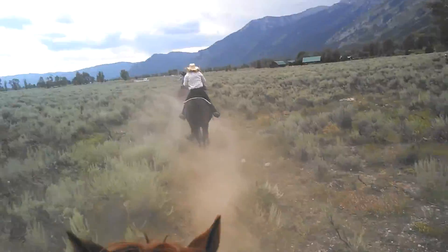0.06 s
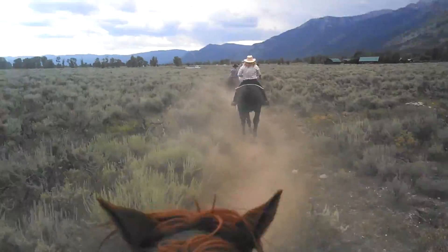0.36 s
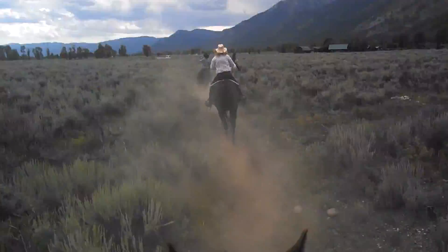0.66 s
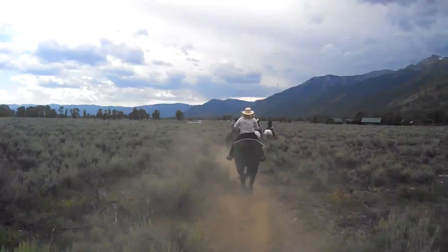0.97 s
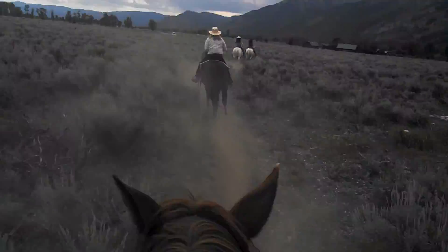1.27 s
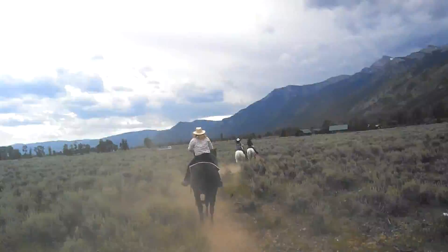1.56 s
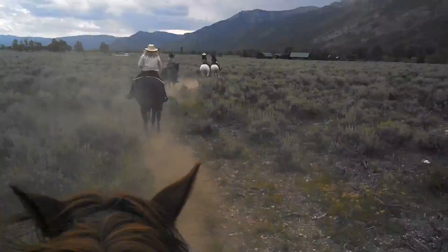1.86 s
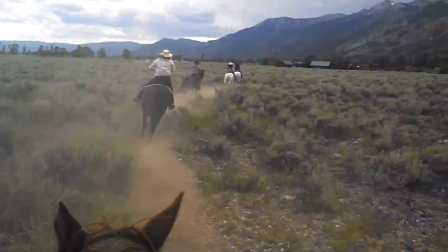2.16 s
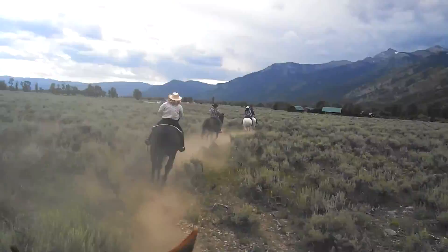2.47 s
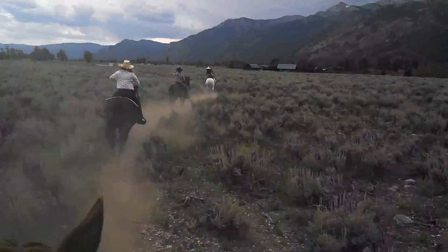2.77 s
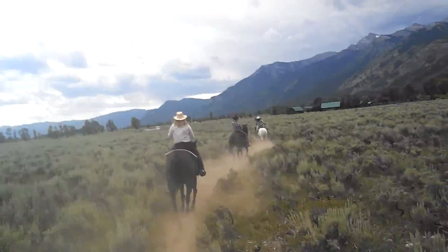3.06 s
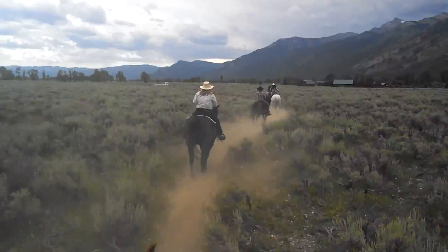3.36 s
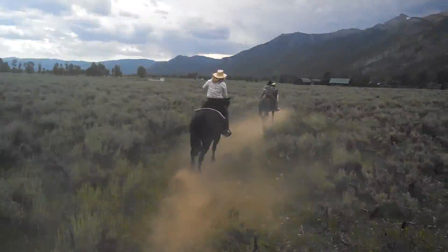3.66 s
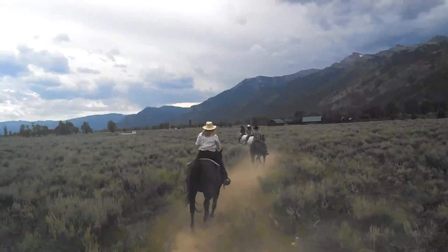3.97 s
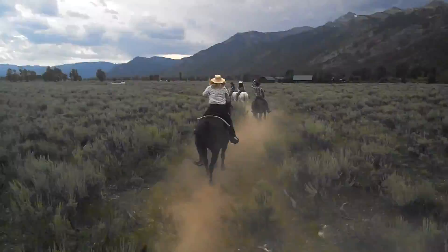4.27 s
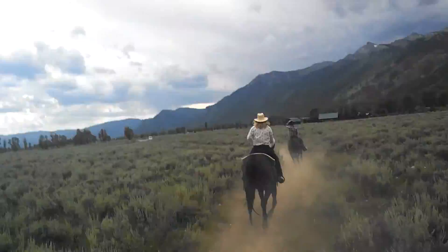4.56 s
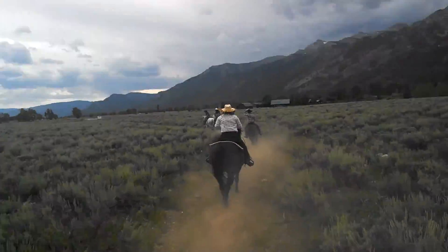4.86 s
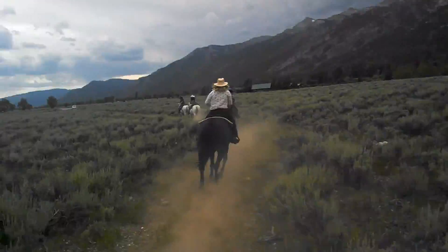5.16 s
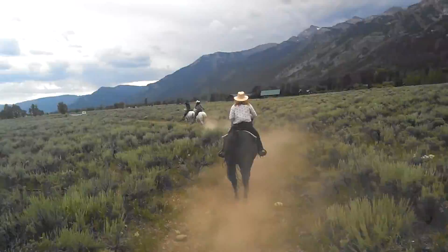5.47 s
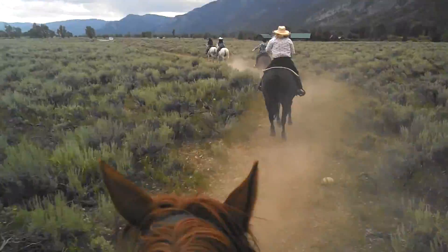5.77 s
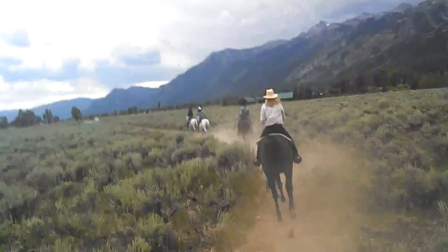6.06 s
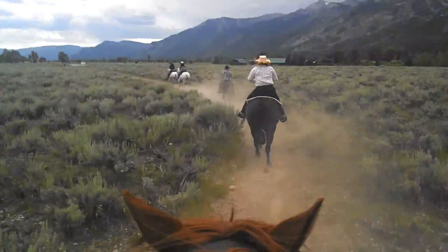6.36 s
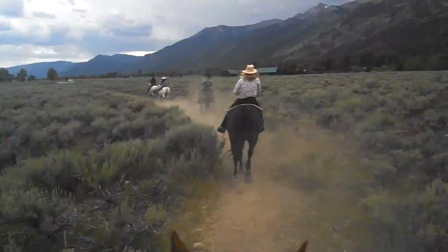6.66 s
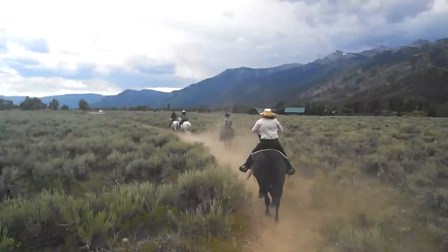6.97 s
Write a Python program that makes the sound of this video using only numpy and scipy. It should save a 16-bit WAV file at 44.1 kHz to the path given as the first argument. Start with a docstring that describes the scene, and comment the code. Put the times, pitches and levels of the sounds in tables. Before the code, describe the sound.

Gusty wind rumbles and thumps on the microphone with each jolt of a trotting horse, over dull hoofbeats and rustling tack.

```python
"""Trotting on a dry dirt trail

Heard from a small camera worn by the rider. Hooves thud and throw grit, clothes and tack rustle,
a buckle rings faintly, the saddle squeaks once. Every jolt drives air over the two microphone ports:
both flutter, the right one also rumbles and pops. The camera widens the pair into stereo."""
import sys
import numpy as np
from scipy import signal
from scipy.fft import rfft, irfft, next_fast_len
from scipy.io import wavfile

SR = 44100
rng = np.random.default_rng(int(sys.argv[2]) if len(sys.argv) > 2 else 0)


def put_to_file(sound):
    """Save the sound as 16-bit audio at rate SR, in the file named by the first command-line argument."""
    columns = np.atleast_2d(sound).T  # one column per channel
    safe = np.clip(columns, -1, 1)
    whole_steps = np.round(safe * 32767)
    wavfile.write(sys.argv[1], SR, whole_steps.astype(np.int16))


N = 317608
TIME = np.arange(N) / SR

# Cue levels are relative, ahead of the mix gains.
# the trot, a jolt and a lull per step: t/s, lull depth/dB, time to its bottom/s, rumble/dB, flutter/dB,
# rustle/dB
TROT_STEPS = [(0.208, 5.5, 0.14, -20.5, -30, -50), (0.707, 6, 0.19, -24.5, -36.5, -54.5),
              (1.178, 13, 0.19, -21.5, -26.0, -40.5), (1.712, 12.0, 0.1, -22.5, -29, -46.5),
              (2.236, 4, 0.15, -28.5, -37.5, -52.5), (2.681, 7.5, 0.18, -27, -35, -53.5),
              (3.243, 5.5, 0.12, -31, -36.5, -53), (3.755, 9, 0.11, -19, -29, -49),
              (4.17, 9, 0.1, -25, -34.5, -48.5), (4.68, 3.5, 0.049, -32.5, -38.5, -56),
              (5.224, 1, 0.037, -37.5, -35.5, -58.5), (5.692, 7, 0.075, -32, -31, -52),
              (6.207, 13, 0.2, -27, -32, -48.5), (6.686, 14.5, 0.083, -20, -32, -43.5),
              (7.171, 7, 0.24, -25, -32, -51.5)]
# wind gusts: t/s, rumble lift/dB, flutter lift/dB, half length/s
WIND_GUSTS = [(0.425, 8.5, 1, 0.049), (0.602, 16, 14.5, 0.028), (1.113, 5.5, -5.5, 0.024),
              (1.48, 5.5, 7, 0.084), (2.01, 3, -2, 0.04), (3.305, 6.5, 3.5, 0.079), (3.587, 6.5, 5, 0.14),
              (4.012, 8, 9.5, 0.017), (4.489, 10.5, 11, 0.029), (4.646, 6, 13, 0.038),
              (5.574, 9.5, 2.5, 0.039), (5.677, 19, -0.5, 0.04), (6.524, 9.5, 12, 0.16)]
# the loudest scuffs of grit and cloth: t/s, level/dB, decay/s, brightness (crunch turned down)/dB
LOUD_SCUFFS = [(0.047, -36, 0.0087, -4.5), (0.118, -37.5, 0.017, 5), (0.183, -23.5, 0.0015, -5),
               (0.247, -23, 0.00061, 25), (0.592, -45.5, 0.015, 11), (0.681, -40, 0.01, -2),
               (0.797, -36.5, 0.0037, 5), (0.961, -34.5, 0.004, 0), (1.01, -39, 0.015, -7.5),
               (1.063, -42.5, 0.018, 10), (1.126, -37, 0.0066, 2), (1.147, -30, 0.0087, -2),
               (1.183, -25, 0.00092, -13.5), (1.323, -34, 0.0015, 7), (1.494, -32, 0.00098, -4),
               (1.63, -35, 0.0073, -1.5), (1.651, -35, 0.0049, 1), (1.71, -28, 0.0025, 11),
               (1.749, -30.5, 0.0012, 9), (2.139, -34, 0.009, -1), (2.227, -38, 0.0078, 0),
               (2.273, -38, 0.0042, 0), (2.318, -40, 0.0042, 6), (2.678, -27.5, 0.0015, -3.5),
               (3.141, -33.5, 0.0026, 0), (3.318, -37.5, 0.0037, -1.5), (3.51, -44, 0.0088, -6),
               (3.57, -33.5, 0.0014, 2), (3.598, -33, 0.0053, 0.5), (3.678, -30, 0.0013, 21),
               (3.708, -21, 0.0016, 41), (4.11, -24, 0.0023, 0.5), (4.252, -41.5, 0.0051, -6.5),
               (4.486, -44, 0.0061, -6), (4.775, -34.5, 0.0078, 9), (4.845, -41.5, 0.0022, 3),
               (4.894, -37.5, 0.0035, 4), (5.112, -33.5, 0.0054, 4), (5.171, -39, 0.0015, 8),
               (5.482, -37.5, 0.0031, -11), (5.915, -28.5, 0.0016, 13), (5.95, -35, 0.0065, 2),
               (6.114, -34.5, 0.0088, 1), (6.388, -36, 0.011, 1), (6.493, -32, 0.0075, -4.5),
               (6.559, -39.5, 0.0039, -7.5), (6.601, -48, 0.036, -2), (6.63, -31, 0.0041, -7),
               (7.183, -29.5, 0.0024, -6)]
# hoof falls: t/s, level/dB, puff decay/s
HOOF_FALLS = [(0.065, -26.5, 0.0047), (0.178, -31, 0.0037), (0.816, -44, 0.005), (0.952, -22, 0.0086),
              (1.025, -17.5, 0.005), (1.146, -20, 0.012), (1.316, -35.5, 0.0072), (1.464, -23.5, 0.0085),
              (1.632, -20.5, 0.043), (1.914, -23, 0.0089), (2.009, -24, 0.027), (2.449, -32, 0.0076),
              (2.559, -28, 0.013), (2.719, -35, .003), (3.051, -30, 0.0098), (3.141, -32, 0.021),
              (4.144, -24.5, 0.012), (4.439, -20, 0.0031), (5.54, -34, 0.012), (5.777, -30, 0.0029),
              (6.045, -25, 0.0072), (6.127, -26, 0.038), (6.496, -27, 0.028), (6.627, -26, 0.022)]
# modes of a hoof's hollow knock: f/Hz, level/dB, t60/s
KNOCK_MODES = [(375, -10.5, 0.033), (520, -8, 0.041), (810, -9.5, 0.038), (1045, -12, 0.02)]
# air pops on the right port, the strong ones in step with the trot: t/s, level/dB, spike width/s
AIR_POPS = [(0.1725, -16.5, 0.000077), (0.2079, 3, 0.000079), (0.2656, 0.0, 0.000095),
            (0.581, -12, 0.00011), (0.7073, -8.5, 0.000052), (1.1785, 0.5, 0.000071), (1.2, -7, 0.00037),
            (1.2198, -5.5, 0.000087), (1.2805, -15, 0.00014), (1.7134, 4.5, 0.000094),
            (1.9173, -18.5, 0.0001), (1.9946, -9.5, 0.00037), (2.124, -14, 0.00016), (2.2361, 2.5, 0.00012),
            (2.6804, 3, 0.00039), (3.2426, -1, 0.00013), (3.4295, -7.5, 0.00032), (3.7565, 4.5, 0.00012),
            (4.1115, -7.5, 0.000052), (4.1703, 4.5, 0.00045), (4.6803, 0.0, 0.000069), (5.0022, 4, 0.00032),
            (5.224, -2.5, 0.000094), (5.6919, -0.5, 0.000086), (6.2067, -5, 0.00015),
            (6.2468, -19.5, 0.00011), (6.545, -8.5, 0.00099), (6.5795, -3.5, 0.00048),
            (6.6153, -12.5, 0.00021), (6.6673, -7.5, 0.001), (6.688, 5.5, 0.00087),
            (6.8551, -14.5, 0.00028), (7.1182, -6.5, 0.000087), (7.1712, -5.5, 0.00011)]
# single eddies shaking the right port: t/s, level/dB, f/Hz, length/s
PORT_EDDIES = [(0.611, 0, 189, 0.0044), (1.029, -15, 520, 0.0021), (1.468, -13, 480, 0.0018),
               (2.185, -11, 261, 0.0019), (2.686, -5.5, 160, 0.002), (3.562, -4.5, 115, 0.0037),
               (4.176, -5.5, 168.5, 0.0033), (5.567, -22.5, 255, 0.011), (6.429, -13.5, 109, 0.0088),
               (6.525, -9.5, 165, 0.004)]
# touches on the buckle: t/s, level/dB
BUCKLE_TOUCHES = [(1.305, -54), (2.942, -46), (3.35, -54), (4.78, -55), (4.913, -40.5), (5.94, -53),
                  (6.8, -51)]
# contour of the leather squeak: t/s, f/Hz, level/dB
SQUEAK_CURVE = [(4.5, 1343, -65), (4.525, 1400, -47), (4.547, 1568, -55), (4.565, 1465, -49),
                (4.585, 1360, -47), (4.605, 1360, -49), (4.64, 1290, -76)]
# EQ curves of the noise layers: f/Hz, level/dB
FLUTTER_EQ = [(90, -22), (160, 2.5), (230, 1.5), (350, -2.5), (500, -10), (750, -18), (1100, -32),
              (2000, -39), (4000, -86)]  # low-mid buffeting of air
RUMBLE_EQ = [(25, 5), (40, -5), (58, 1), (85, -2.5), (130, -8.5), (200, -17.5), (300, -52), (600, -95)]  # bass of the wind
RUSTLE_EQ = [(400, 9), (1000, 11), (1800, 7), (3000, 5), (4300, 2.5), (6000, -3.5), (8500, 1.5),
             (11500, -8.5), (14800, -2.5), (17000, -15)]  # hiss of dust and cloth
GRIT_EQ = [(2500, -32), (4500, 6), (6000, 1.5), (8500, 6), (12000, -3.5), (14800, 1), (17000, -11)]  # bright sand clicks
CRUNCH_EQ = [(400, 4), (1000, 3.5), (1900, -0.5), (3000, 0), (4200, -1.5), (6000, -15)]  # midrange body of a scuff
THUD_EQ = [(100, 11.5), (250, 13.5), (500, 3), (1000, -7), (1500, -5), (3000, -24), (8000, -43)]  # dull puff of dirt

RUMBLE_LULL_SHARE, RUSTLE_GUST_SHARE = 0.66, 0.64  # how far rumble follows a lull, and rustle a gust
LIGHT_SCUFF_COUNT, LIGHT_SCUFF_DB, LIGHT_SCUFF_S = 32, 9.5, 0.0017  # dB over the rustle; typical decay
REBOUND_HZ, SLOW_POP_S = 123, .00019  # a pop's bass cut rises in proportion for spikes wider than this
BUCKLE_HZ, BUCKLE_T60_S = 12575, 0.16
PORT_LAG_S, CUTOFF_HZ = .000357, 15900


def from_db(db):
    return 10 ** (np.asarray(db) / 20)


def rms_one(x):
    return x / np.sqrt(np.mean(x ** 2) + 1e-20)


def cut(x, hz, kind, order=2):
    """Butterworth low-pass or high-pass."""
    return signal.sosfilt(signal.butter(order, np.clip(hz, 10, .45 * SR), kind, fs=SR, output="sos"), x)


def add(track, s, piece):
    """Mixes a piece in from time s on."""
    i = int(np.clip(round(s * SR), 0, N - 1))
    track[i:i + len(piece)] += piece[:N - i]


def drift(rate):
    """Smooth random modulator, rms 1, rolling off above rate in Hz."""
    pole = np.exp(-20 * np.pi * rate / SR)
    slow = signal.lfilter([1], [1, -2 * pole, pole * pole], rng.standard_normal(N // 10 + 2002))[2000:]
    return np.interp(np.arange(N) / 10, np.arange(len(slow)), rms_one(slow))


def coloured(source, eq):
    """A source through an EQ curve, rms 1."""
    size = next_fast_len(N)
    hz, level_db = np.transpose(eq)
    bins = np.fft.rfftfreq(size, 1 / SR) + 1e-3
    gain = from_db(np.interp(np.log(bins), np.log(hz), level_db)) * np.minimum(bins / hz[0], 1) ** 2
    return rms_one(irfft(rfft(source, size) * gain, size)[:N])


def noise(eq):
    return coloured(rng.standard_normal(N), eq)


def lumpy(x, depth_db, rate):
    """Turbulence or grain: the level jumps about, its mean power stays."""
    return x * rms_one(from_db(depth_db * np.clip(drift(rate), -2, 2)))


def patchy(x, depth_db, rate):
    """Rubbing keeps changing colour: overlapping bands swell and fade on their own."""
    size = next_fast_len(N)
    spectrum, hz = rfft(x, size), np.fft.rfftfreq(size, 1 / SR)
    centres = [1000, 2000, 3500, 5500, 8000, 11000, 15000]
    bands = (irfft(spectrum * np.interp(hz, centres, share), size)[:N] for share in np.eye(len(centres)))
    return sum(lumpy(band, depth_db, rate) for band in bands)


def trot_envelopes():
    """Rumble, flutter and rustle in dB: they duck after each jolt, recover, and swell in gusts."""
    jolts, depths, lengths, *levels = np.transpose(TROT_STEPS)
    rumble_db, flutter_db, rustle_db = (np.interp(TIME, jolts, level) for level in levels)
    since = np.maximum(TIME - jolts[:, None], 0) / lengths[:, None]
    lull = depths @ (since * np.exp(1 - since)) ** 2
    peaks, rumble_lifts, flutter_lifts, halves = np.transpose(WIND_GUSTS)
    swells = np.exp(-np.minimum(((TIME - peaks[:, None]) / halves[:, None]) ** 2, 20))
    gust = flutter_lifts @ swells
    return (rumble_db - RUMBLE_LULL_SHARE * lull + rumble_lifts @ swells,
            flutter_db - lull + gust,
            rustle_db - lull + RUSTLE_GUST_SHARE * gust)


def wind(eq, level_db, depth_db, rate):
    """Turbulent air buffets a microphone port."""
    return lumpy(noise(eq), depth_db, rate) * from_db(level_db)


def rustle(rustle_db, bed_db, tick_db):
    """Hiss of dust and cloth over a faint floor, sprinkled with small ticks of sand."""
    sizes = from_db(8.75 * np.minimum(rng.exponential(1, N), 2)) * (rng.random(N) < 35 / SR)
    ticks = signal.lfilter([1], [1, -np.exp(-1 / (0.0027 * SR))], sizes + 1e-18)
    bed = lumpy(from_db(bed_db), depth_db=6.5, rate=13)
    hiss = lumpy(patchy(noise(RUSTLE_EQ), depth_db=3.5, rate=15), depth_db=3.0, rate=220)
    return hiss * (from_db(rustle_db) * (bed + from_db(tick_db) * ticks) + from_db(-80.5))


def sand_grains(per_second, spread_db):
    """Separate clicks of sand, mostly small, rms 1."""
    sizes = from_db(spread_db * np.minimum(rng.exponential(1, N), 3)) * rng.choice([-1, 1], N)
    return coloured(sizes * (rng.random(N) < per_second / SR), GRIT_EQ)


def scuffs(cues, grit_db, crunch_db):
    """Grit and cloth scuff with a fast attack and a short tail: bright grains over a lower crunch."""
    grit_env, crunch_env, t = np.zeros(N), np.zeros(N), TIME[:SR // 10]
    for s, level_db, decay, bright_db in cues:
        envelope = from_db(level_db) * np.exp(-t / decay) * (1 - np.exp(-t / (0.27 * decay)))
        add(grit_env, s, envelope)
        add(crunch_env, s, from_db(-bright_db) * envelope)
    grit = from_db(grit_db) * grit_env * sand_grains(per_second=5000, spread_db=7.5)
    crunch = from_db(crunch_db) * crunch_env * noise(CRUNCH_EQ)
    return lumpy(patchy(grit + crunch, depth_db=3.0, rate=95), depth_db=4.0, rate=380)


def light_scuff_cues(rustle_db, spread_db, bright_db, bright_spread_db):
    """Lighter scuffs, scattered over the ride at a level that follows the rustle."""
    times = (np.arange(LIGHT_SCUFF_COUNT) + rng.random(LIGHT_SCUFF_COUNT)) * TIME[-1] / LIGHT_SCUFF_COUNT
    force, stretch, colour = rng.uniform(-1, 1, (LIGHT_SCUFF_COUNT, 3)).T
    levels_db = np.interp(times, TIME, rustle_db) + LIGHT_SCUFF_DB + spread_db * force
    return list(zip(times, levels_db, LIGHT_SCUFF_S * 2 ** stretch, bright_db + bright_spread_db * colour))


def hooves(puff_db, knock_db):
    """A hoof knocks hollowly, never twice alike, and drives a dull puff out of the dirt."""
    puff_env, knocks, t = np.zeros(N), np.zeros(N), TIME[:SR // 5]
    for s, level_db, decay in HOOF_FALLS:
        add(puff_env, s, from_db(level_db) * np.exp(-t / decay))
        for hz, mode_db, t60 in KNOCK_MODES:
            detune, force = rng.standard_normal(2)
            ring = np.sin(2 * np.pi * hz * (1 + 0.12 * detune) * t) * np.exp(-np.log(1000) * t / t60)
            add(knocks, s, from_db(level_db + mode_db + 2 * force) * ring)
    return from_db(puff_db) * puff_env * noise(THUD_EQ) + from_db(knock_db) * knocks


def pops(ceiling_hz, hollow_hz, hollow_share):
    """A pop is one pressure spike; the microphone's bass cut adds the rebound, its housing a mid scoop."""
    out, t = np.zeros(N), TIME[:1200] - TIME[200]
    for s, level_db, width in AIR_POPS:
        spike = 1 / np.cosh(np.minimum(np.abs(t / width), 20))
        spike = cut(spike, REBOUND_HZ * max(1, width / SLOW_POP_S), "high")
        spike = cut(spike, ceiling_hz, "low", order=8)
        add(out, s + t[0], -from_db(level_db) * spike / np.abs(spike).max())
    return out - hollow_share * signal.lfilter(*signal.iirpeak(hollow_hz, 2, fs=SR), out)


def eddies():
    """An eddy swings the pressure for a few cycles."""
    out = np.zeros(N)
    for s, level_db, hz, length in PORT_EDDIES:
        t = TIME - s
        envelope = np.exp(-np.abs(t) / (2 * length) - (t / (3 * length)) ** 2)
        out -= from_db(level_db) * envelope * np.cos(2 * np.pi * hz * t)
    return out


def buckle():
    """Light touches on a high metal mode, split in two so that the ring beats."""
    out, t = np.zeros(N), TIME[:SR // 2]
    ring = np.sin(2 * np.pi * BUCKLE_HZ * t) + 0.69 * np.sin(2 * np.pi * (BUCKLE_HZ + 45) * t)
    for s, level_db in BUCKLE_TOUCHES:
        add(out, s, from_db(level_db - 2.0) * np.exp(-np.log(1000) * t / BUCKLE_T60_S) * ring)
    return out


def saddle(second_db, third_db):
    """Leather sticks and slips: three harmonics, unsteady in pitch and level."""
    times, *curves = np.transpose(SQUEAK_CURVE)
    hz, level_db = (np.interp(TIME, times, curve) for curve in curves)
    phase = 2 * np.pi * np.cumsum(hz * (1 + .025 * drift(250))) / SR
    tone = np.sin(phase) + from_db(second_db) * np.sin(2 * phase) + from_db(third_db) * np.sin(3 * phase)
    gate = (TIME > times[0]) & (TIME < times[-1])
    return gate * from_db(level_db + 1.5) * lumpy(tone, depth_db=-2.0, rate=106)


def scene():
    """Left and right port: the hooves sit in both, each has its own wind and rubbing texture."""
    rumble_db, flutter_db, rustle_db = trot_envelopes()
    thuds = hooves(puff_db=-8.5, knock_db=-3.5)
    cues = list(LOUD_SCUFFS) + light_scuff_cues(rustle_db, spread_db=3, bright_db=11, bright_spread_db=4)
    left = wind(FLUTTER_EQ, flutter_db - 0.4, depth_db=7.5, rate=33)
    left += rustle(rustle_db, bed_db=-1.5, tick_db=-11.5) + scuffs(cues, grit_db=0.0, crunch_db=1.5)
    left += buckle() + saddle(second_db=5.0, third_db=-19.0)
    right = wind(FLUTTER_EQ, flutter_db - 0.54, depth_db=5.0, rate=97)
    right += wind(RUMBLE_EQ, rumble_db + 3.5, depth_db=2.0, rate=15)
    right += rustle(rustle_db, bed_db=-1.0, tick_db=-1.13) + scuffs(cues, grit_db=0.7, crunch_db=1.0)
    right += pops(ceiling_hz=3430, hollow_hz=1370, hollow_share=0.48) + eddies()
    return np.array([left + thuds, right + thuds])


def record(dry):
    """The camera's chain: sub-bass cut, stereo widening, clipping on loud pops, steep top cut."""
    ports = cut(dry, 41.5, "high", order=7)
    # widening subtracts the opposite port, delayed by their spacing
    delayed_time = TIME - round(PORT_LAG_S * SR) / SR
    opposite = np.array([np.interp(delayed_time, TIME, port) for port in ports[::-1]])
    wide = (ports - .94 * opposite) * from_db([[-1.1], [0]])
    top_cut = signal.ellip(10, .2, 70, CUTOFF_HZ, fs=SR, output="sos")
    return signal.sosfilt(top_cut, np.clip(wide, -1, 1))


dry = scene()
out = record(dry)
put_to_file(out)
```